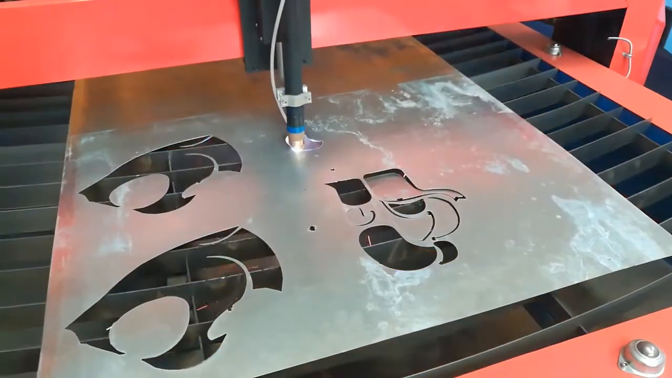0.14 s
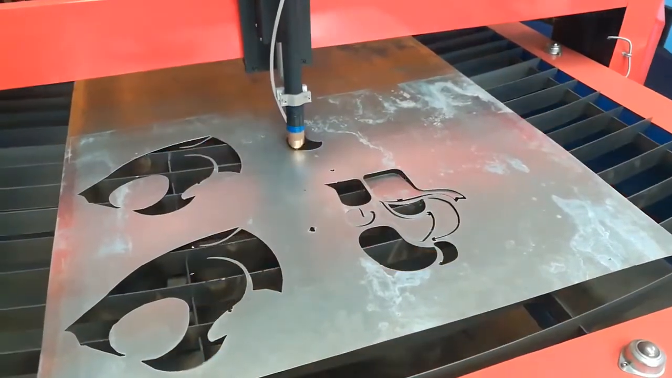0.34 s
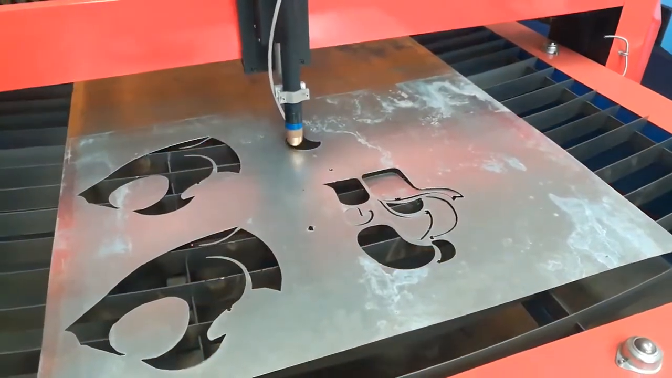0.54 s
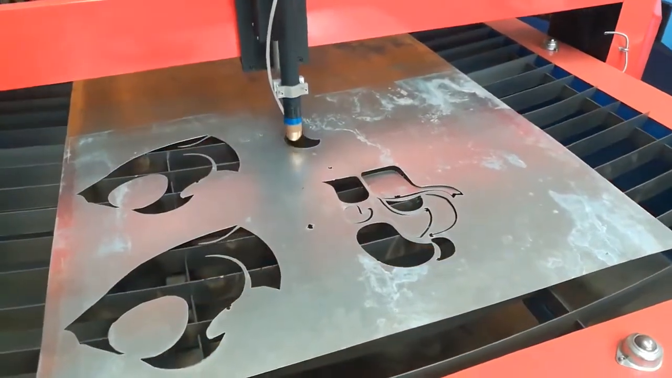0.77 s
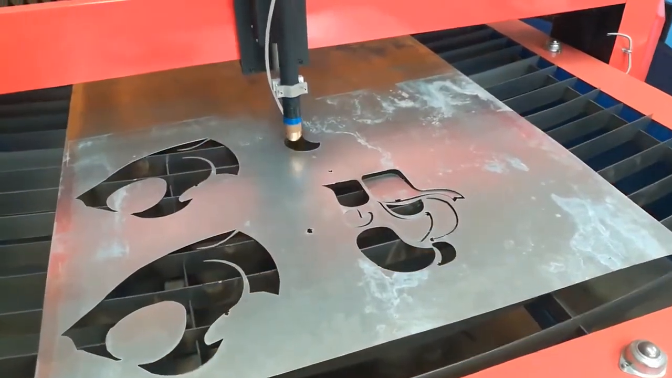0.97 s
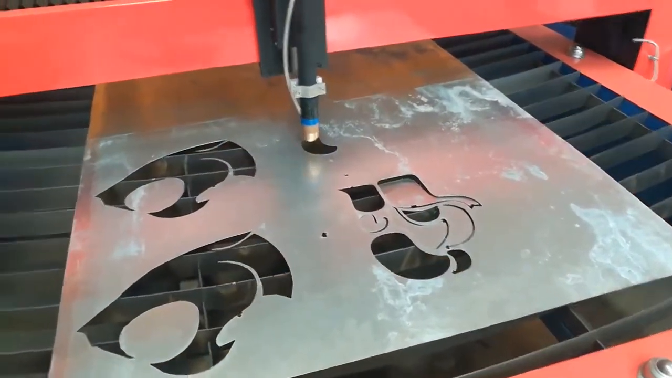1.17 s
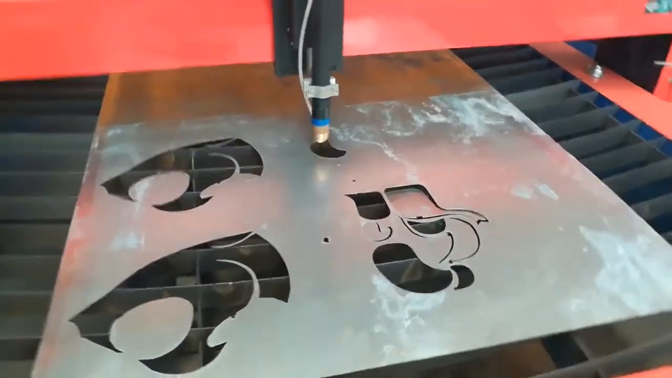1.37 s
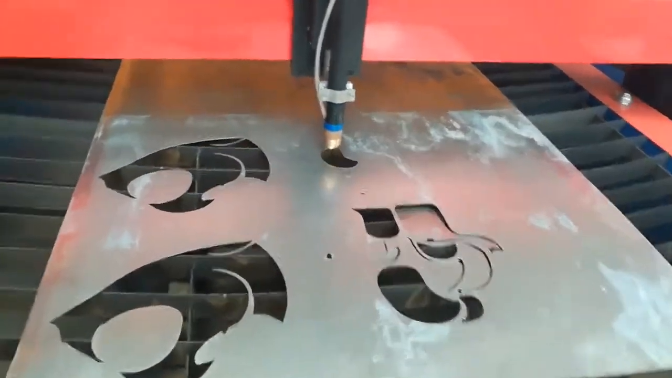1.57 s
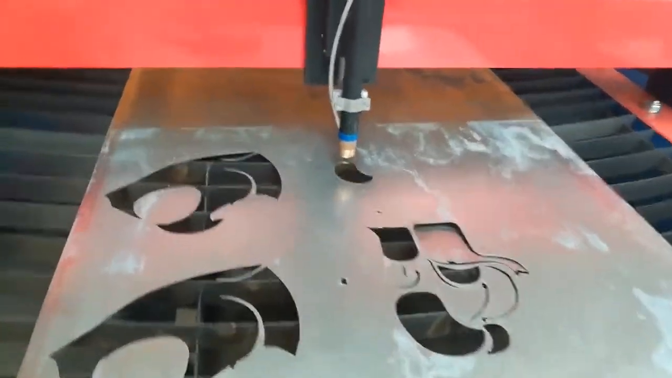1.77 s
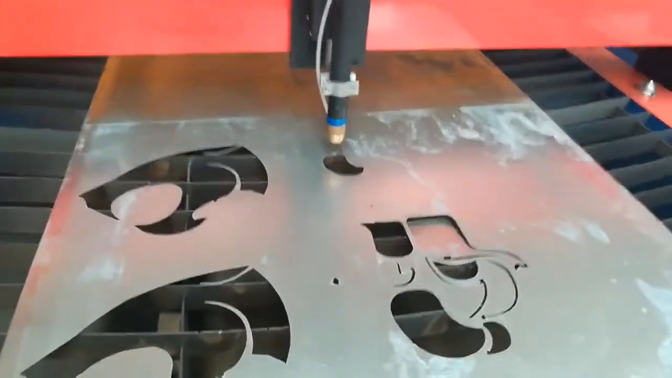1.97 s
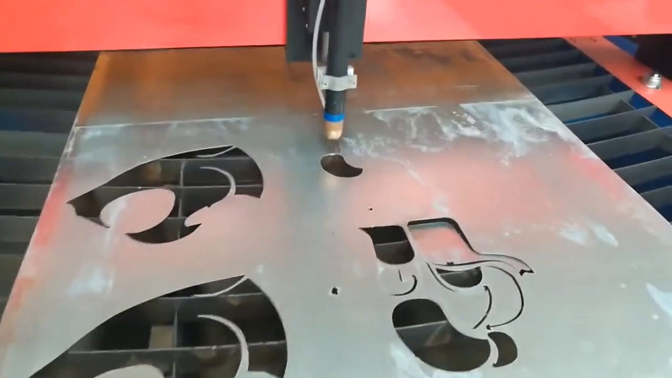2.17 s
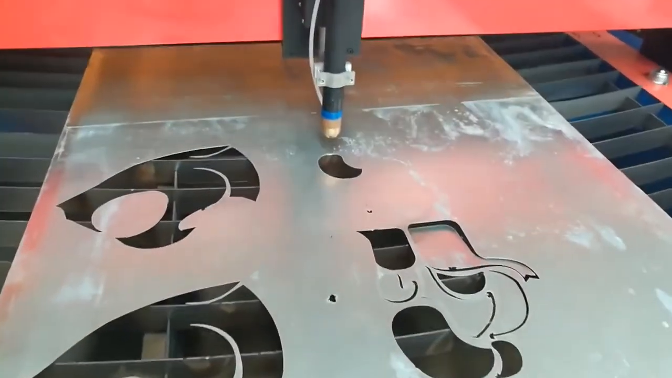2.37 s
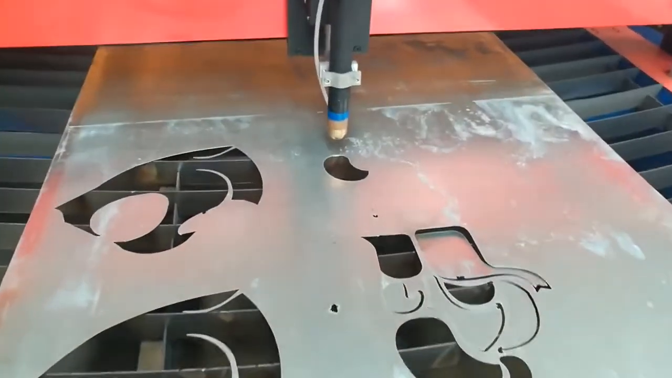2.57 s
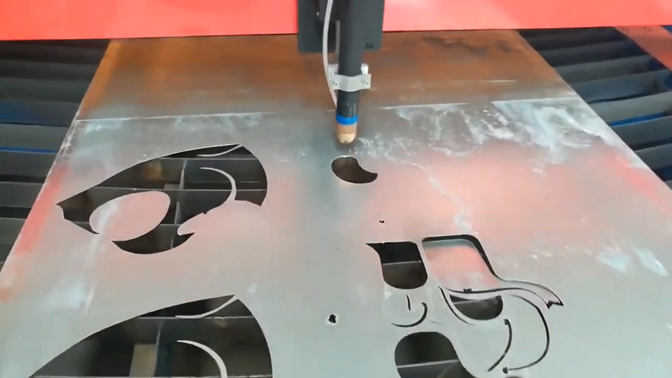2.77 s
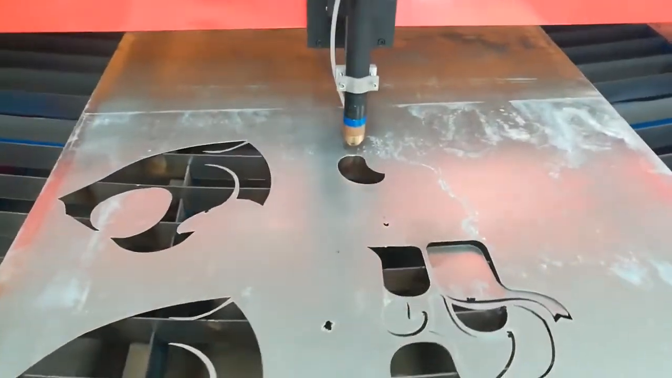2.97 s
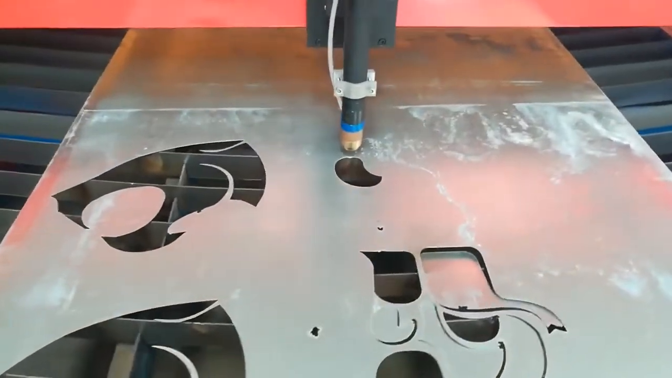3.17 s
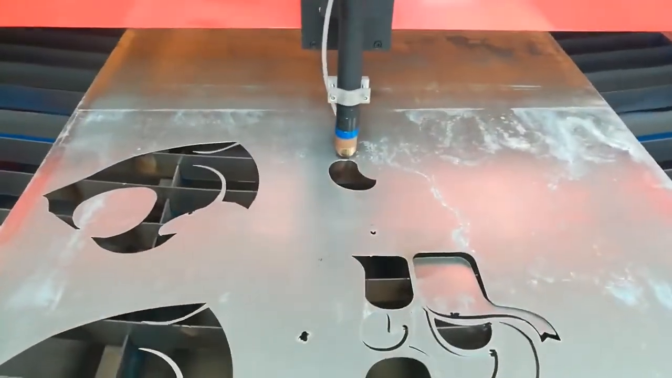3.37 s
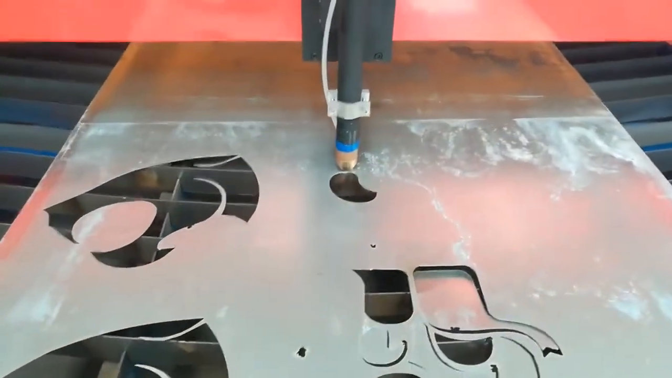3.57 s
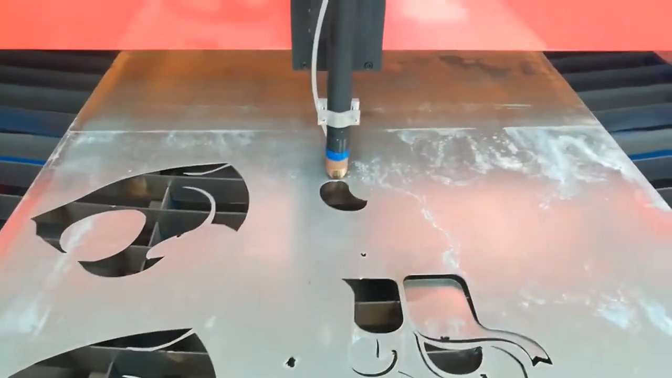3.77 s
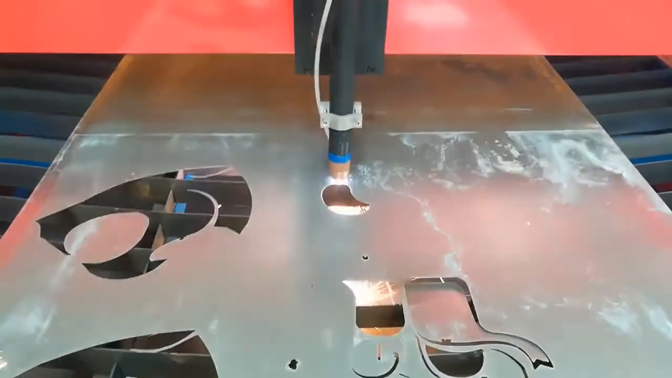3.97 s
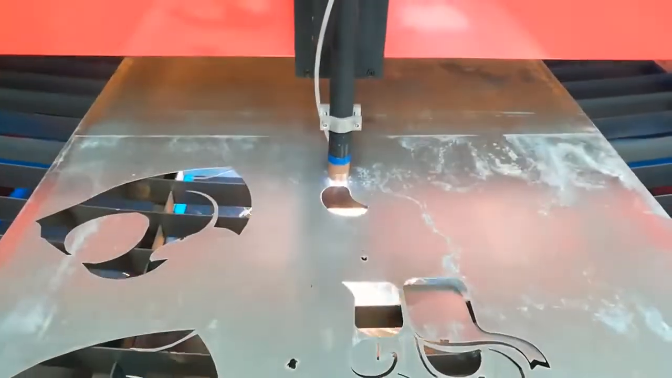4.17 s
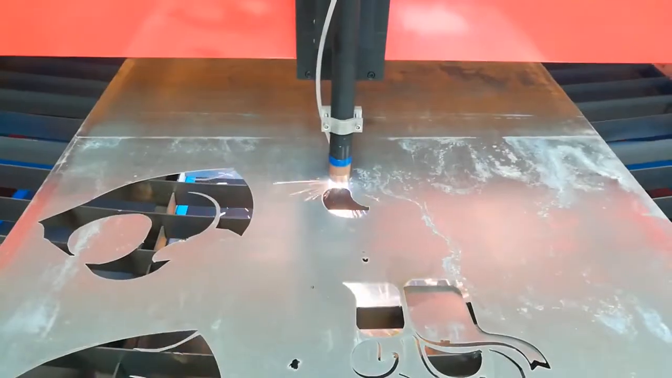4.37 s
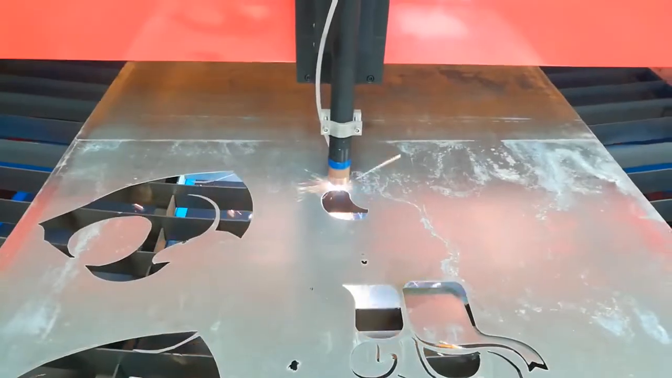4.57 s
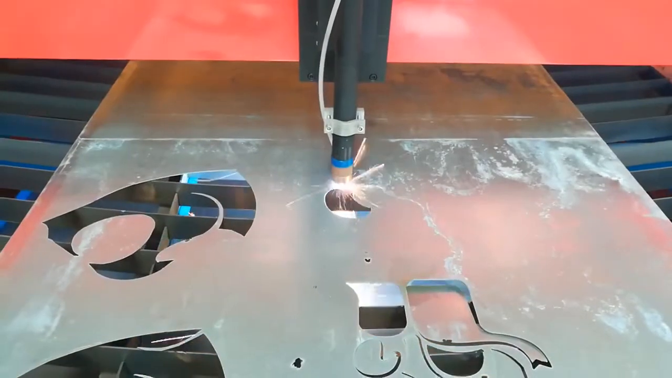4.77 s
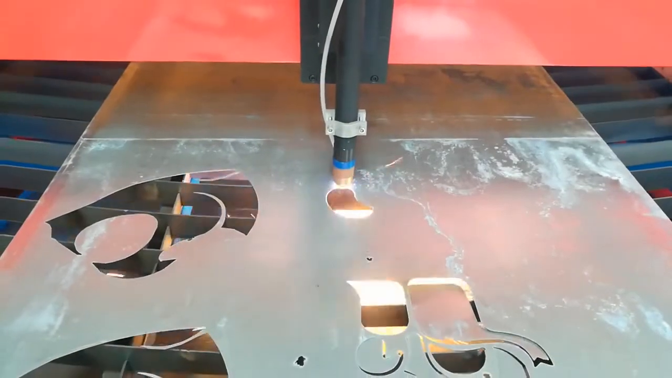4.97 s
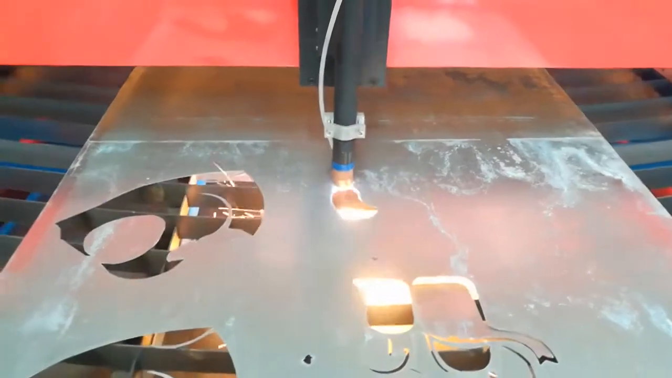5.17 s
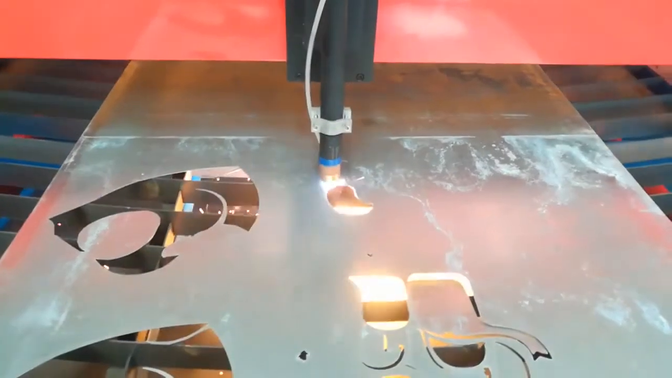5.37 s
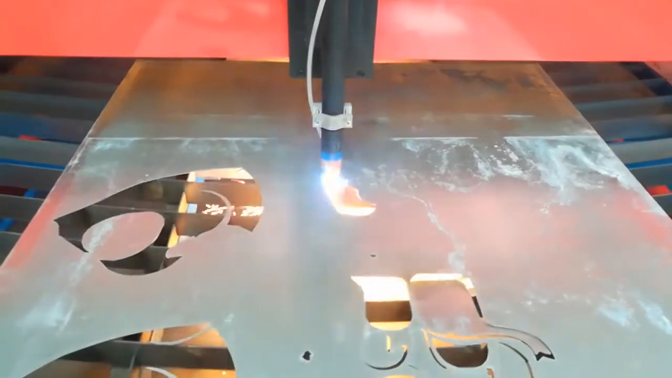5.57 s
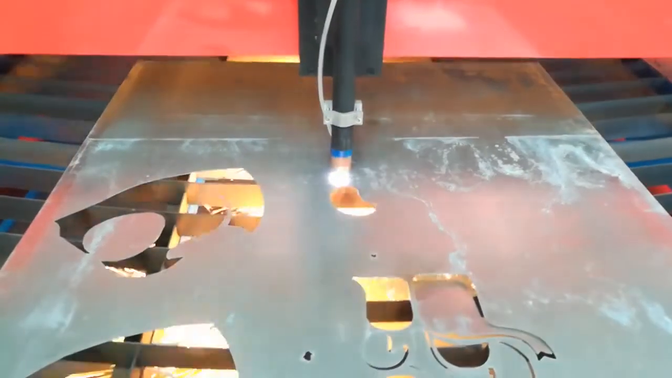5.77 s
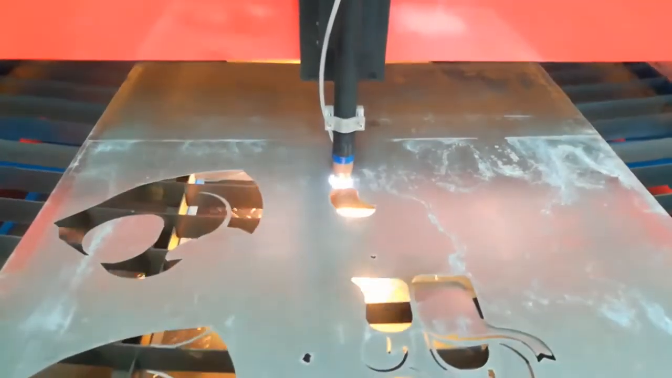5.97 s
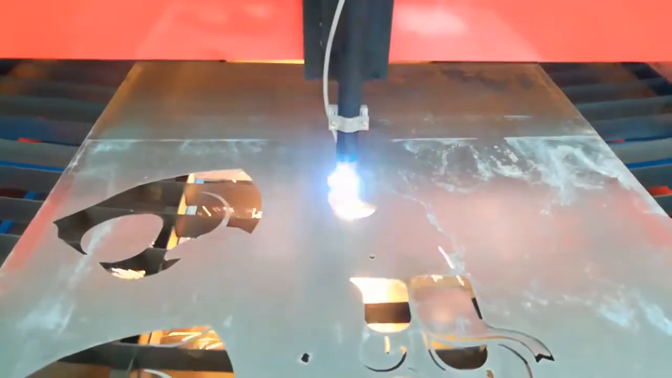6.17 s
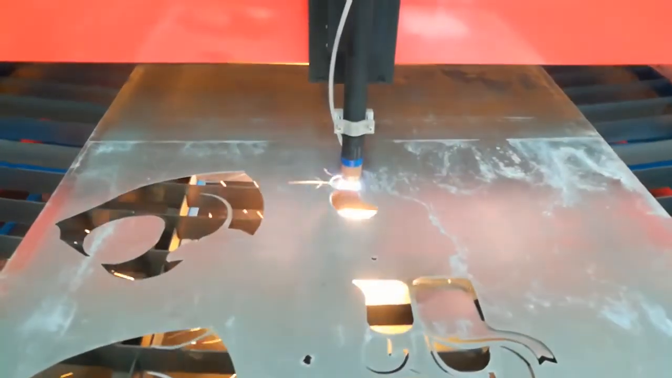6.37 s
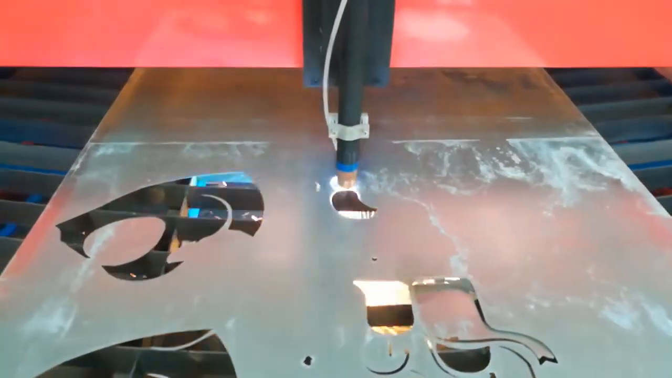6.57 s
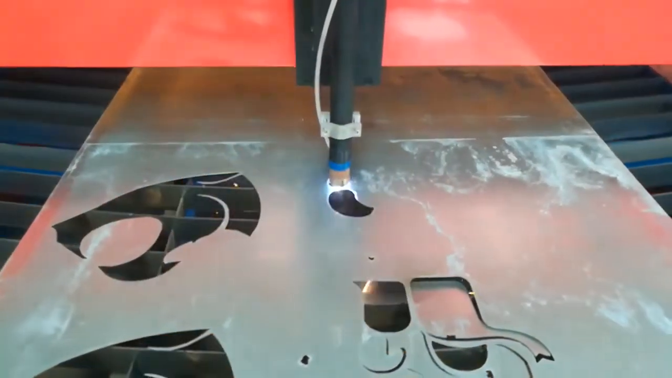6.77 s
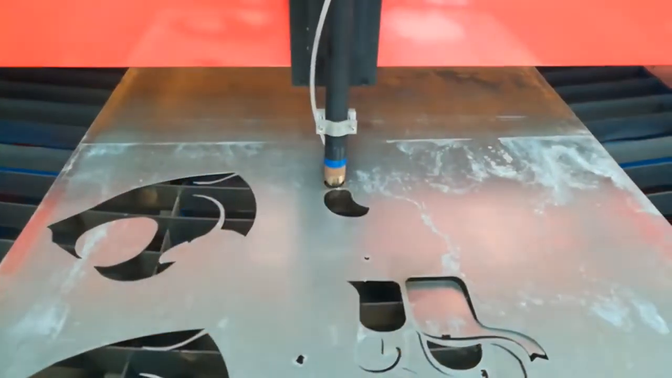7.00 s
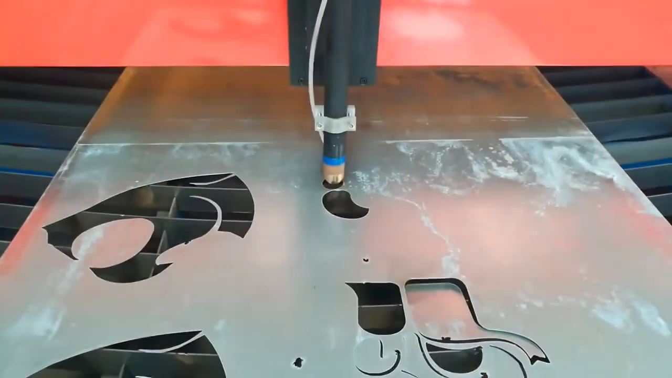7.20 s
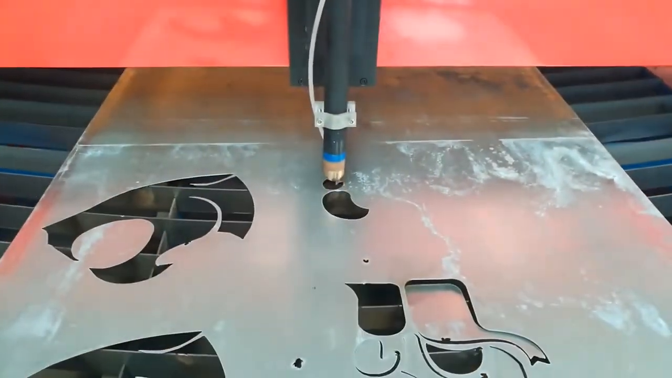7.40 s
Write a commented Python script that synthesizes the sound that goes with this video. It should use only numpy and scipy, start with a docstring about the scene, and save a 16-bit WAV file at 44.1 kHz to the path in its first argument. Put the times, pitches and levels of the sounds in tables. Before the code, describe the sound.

A plasma torch's harsh hiss cuts out with a thump, compressed air blows on, then the arc strikes, pierces steel plate, cuts and stops.

```python
"""A cutting arc hisses and fizzes and goes out with a thump; compressed air blows on while the torch head moves,
then the arc strikes again, pierces the steel plate, cuts and stops. The jet is turbulent noise in five registers,
coloured and levelled by what the torch does: it roars on plate, sings in the kerf, hisses at the nozzle.
Blown resonances whistle in the hole, damped pushes thump, and workshop rumble with a drive hum lies below."""
import sys
import numpy as np
from scipy import signal
from scipy.fft import rfft, irfft, next_fast_len
from scipy.io import wavfile
from scipy.ndimage import uniform_filter1d, map_coordinates

SR = 44100
rng = np.random.default_rng(int(sys.argv[2]) if len(sys.argv) > 2 else 0)


def unload_audio(sound):
    """Save the sound as a 16-bit wav file, at the path given as the first command line argument."""
    columns = np.transpose(np.atleast_2d(sound))
    # keep every value between -1 and 1, then stretch to whole-number steps
    steps = np.round(np.clip(columns, -1, 1) * 32767)
    wavfile.write(sys.argv[1], SR, steps.astype(np.int16))


N = 328104

# torch stances in order: spectrum_name, start_s, end_s
STANCES = [("TRAIL", 0, .352), ("OVER_CUT", .352, .87), ("AIR", .87, 2), ("HOVER", 2, 3.45),
           ("OPEN", 3.45, 3.857), ("PIERCE", 3.857, 4.99), ("ARC", 4.99, 6.988), ("AFTER", 6.988, 9)]
# register levels per stance, a first and a last row: rumble_db, plate_roar_db, kerf_db, spatter_fizz_db, nozzle_hiss_db
STANCE_LEVELS = dict( TRAIL=[(-53, -41, -29, -32.5, -27), (-52.5, -41, -31.5, -35.5, -27.5)],
                 OVER_CUT=[(-52.5, -43, -37.5, -48, -42.5), (-68, -53, -34.5, -46, -41.5)],
                 AIR=[(-57.5, -39.5, -33, -44, -41.5), (-59, -45.5, -37.5, -63, -43.5)],
                 HOVER=[(-55, -47.5, -38, -51, -45.5), (-74, -55.5, -36, -51.5, -39.5)],
                 OPEN=[(-59, -57.5, -43, -54.5, -34), (-68, -58, -45.5, -50.5, -34)],
                 PIERCE=[(-58.5, -39, -26, -29.5, -22.5), (-58.5, -39.5, -29, -32.5, -25.5)],
                 ARC=[(-60, -48.5, -31.5, -38, -25.5), (-59.5, -46.5, -33, -41, -26.5)],
                 AFTER=[(-63, -51.5, -41, -52, -43), (-69, -51.5, -40.5, -49, -42.5)])
# edges between the five registers: edge_hz
REGISTER_EDGES_HZ = [350, 1600, 4500, 8000]
# random wander of each register: wander_db
WANDER_DB = [2.8, 1.47, 0.38, 1.2, 0.32]
# jet swells or dips (meets plate, backs up in the hole, flares):
# peak_s, rise_s, fall_s, roar_db, kerf_db, fizz_db, hiss_db
SWELLS = [(.145, .025, .025, 2, 3.5, 0, 0.5), (.15, 0.053, .13, 5.5, 5, 1, 1.5),
          (.35, .02, 0.12, 3.5, 4, 5.5, 0), (.96, 0.071, 0.15, 3.5, 2, 1, 0),
          (1.1, .08, .08, 0.5, 2.5, 0.5, 0), (1.3, 0.16, 0.18, 7, 3.5, 3, 1),
          (1.63, 0.22, 0.23, 8.5, 1.5, 1, 2.5), (2.14, .1, 0.11, 1, 3.5, 4, -1),
          (2.42, .04, 0.22, 4, -0.5, -1, 0), (3.44, .07, .05, -4, 0, 6, 4),
          (3.83, 0.031, 0.034, -1, 13, 1, 2), (3.871, 0.013, 0.018, 0, -3, -11, 7),
          (4.17, 0.16, 0.067, 3.5, 2.5, 4, 3), (4.187, 0.014, .015, 6, 6, 3, 2),
          (4.24, 0.018, 0.058, 7.5, 2, 1.5, -1), (4.54, 0.11, .06, 1, 1.5, 0.5, 0.5),
          (4.74, .35, 0.17, 5, 9, 6, 4.5), (5.15, .1, 0.18, 4, 2, 2, -1),
          (5.8, 0.043, 0.37, 1, -1.5, -4.5, 3), (6.14, .15, 0.13, 0.5, 2, 1, 0),
          (6.43, 0.1, 0.12, 1.5, 1.5, 0, 2), (6.54, .03, 0.036, 6, 2, 0, -3),
          (6.6, 0.085, .1, 0.5, 3, 4, -2), (6.74, .12, 0.11, 11, 10, 8, 2.5),
          (6.8, 0.022, 0.027, 0, 3, 5, 1.5), (6.975, 0.024, 0.077, 10, 2, 2, -1.5)]
RUMBLE_PER_ROAR = 0.59  # share of a roar swell, in dB
# gas flow falters: centre_s, length_s, level_db
FALTERS = [(0.173, 0.02, -6), (4.778, 0.02, -2), (6.772, 0.015, -6.5)]

# spectra, relative density per Hz: freq_hz, density_db
# trailing arc
TRAIL_SPECTRUM = [(76, -38), (130, -10), (252, -5.5), (440, -25.5), (1000, -15), (1430, -16.5), (2230, -10),
                  (2750, -2), (3200, -2), (3500, -8), (4960, -14), (6830, -18), (8510, -12), (15500, -13.5)]
# air over the fresh cut
OVER_CUT_SPECTRUM = [(76, -56), (130, -23), (300, -19), (477, -23.5), (1110, -8.5), (1600, -14),
                     (2100, -8.5), (2600, -2.5), (3250, -6.5), (3700, -13.5), (4670, -18), (6500, -22),
                     (10400, -14), (15500, -16)]
# air sweeping across plate
AIR_SPECTRUM = [(76, -43), (130, -16), (280, -10.5), (487, -17.5), (1020, -6), (1750, -9.5), (3190, 0),
                (3750, -12), (5700, -19.5), (8500, -21.5), (11000, -15.5), (14500, -19.5), (15500, -19)]
# air from the waiting torch
HOVER_SPECTRUM = [(76, -35), (180, -8), (500, -21.5), (800, -14.5), (1020, -8.5), (1620, -11), (2320, -3.5),
                  (3260, -4.5), (3600, -10.5), (4100, -12.5), (4500, -18), (7390, -22.5), (9030, -14),
                  (13700, -9.5), (15500, -11.5)]
# air in the open
OPEN_SPECTRUM = [(59, -42), (100, -24), (146, -28), (270, -24), (576, -28), (861, -17), (2130, -19.5),
                 (3610, -8), (6000, -19.5), (9150, -13), (15500, -7)]
# piercing arc
PIERCE_SPECTRUM = [(59, -58), (100, -28), (270, -28), (477, -32), (1180, -12.5), (1310, -17.5), (1840, -18),
                   (3120, 0.5), (4020, -6), (4460, -8), (8060, -9.5), (12800, -2.5), (15500, -6)]
# cutting arc
ARC_SPECTRUM = [(59, -54), (100, -33), (156, -17.5), (411, -27), (640, -19), (1180, -10), (1340, -14),
                (2130, -12.5), (3250, -1), (5280, -10), (11300, -7), (13400, -2.5), (15500, -6)]
# cooling air through the kerf
AFTER_SPECTRUM = [(76, -53), (130, -24), (407, -30.5), (787, -17), (1130, -9.5), (1250, -13), (1550, -13.5),
                  (1820, -15), (2410, -5.5), (2890, -7.5), (3190, -5), (5260, -22.5), (15500, -18)]
# workshop rumble
SHOP_SPECTRUM = [(15, -35), (25, -8.5), (54, -2), (124, -9.5), (140, -5.5), (180, -34), (310, -120)]

# resonances of the pierced hole: centre_hz, width_hz, relative_db
HOLE_MODES = [(1130, 80, -30), (1500, 46, -20), (2710, 30, -10), (3310, 64, -10), (3550, 80, -12),
              (3993, 114, 4.5), (4000, 90, -22)]
# resonances of the open kerf: centre_hz, width_hz, over_roar_db
KERF_MODES = [(1154, 100, -6), (1480, 30, -18), (3190, 230, -16.5)]
# pressure steps: start_s, relative_db, boom_hz, relative_snap_db
THUMPS = [(.137, -26.5, 182, 0), (.340, -33.5, 169, 10), (.869, -46, 253, 13), (1.209, -39, 252, 19),
          (2.055, -36.5, 124, -12), (3.858, -36, 140, 0), (4.234, -44, 200, 12), (4.529, -44, 80, 6),
          (4.749, -40, 182, 8), (6.734, -28, 190, 9), (6.776, -41, 150, -6), (6.974, -35.5, 152, 15)]

# port balance: freq_hz, left_over_right_db
PORT_BALANCE = [(400, -0.5), (1300, -1), (2000, -3.5), (3000, -10.5), (4000, -8.5), (4800, 2.5), (6200, 1),
                (8000, -4.5), (10000, -11.5), (13000, -10), (14600, -17), (15400, -28)]
# likeness of the turbulence at the two ports: freq_hz, likeness_0_to_1
PORT_LIKENESS = [(60, 0.9), (130, 1), (290, 1), (640, 0.47), (1200, 0.97), (1900, 0.29), (3100, 0.86),
                 (5000, 0.21), (8000, 0), (15000, 0.5)]
# phase lead of the left port: freq_hz, lead_rad
PORT_LEAD = [(1900, -0.5), (2500, 1.5), (3200, 1.73), (4400, 2.5), (6000, 4), (8000, 5), (15500, 12.5)]

TOP_HZ = 15850
# upper registers, left over right; the balance swings left once
PAN_DB, SWING_DB, SWING_FROM_S, SWING_TO_S, SWING_RAMP_S = -2, 3.3, 1.47, 2.05, 0.23
# WHISTLE_GROWTH: whistle dB per dB of kerf swell
WHISTLE_DB, WHISTLE_GROWTH, WHISTLE_FROM_S, WHISTLE_TO_S, WHISTLE_FADE_S = -35, 1.6, 3.87, 4.82, 0.17
# thin tone arching as the arc dies
GLIDE_FROM_S, GLIDE_TOP_S, GLIDE_TO_S = .185, .235, .34
GLIDE_HZ, GLIDE_TOP_HZ, GLIDE_DB, GLIDE_SAG_DB = 3640, 3820, -30, 10
SHOP_DB = -63
# table drive
HUM_HZ, HUM_FROM_S, HUM_TO_S, HUM_RAMP_S, HUM_DB = 72, 5.2, 6.15, .12, -61


def jet(swells_db):
    """Gas jet: turbulence in five registers, coloured, levelled and echoed anew for each torch stance."""
    noise, flow, surge = eddies(patchy_db=1.5, flutter_db=0.12), faltering(), wobble(14)
    gains = [amp(db + 0.21 * surge + wander_db * wobble(9)) for db, wander_db in zip(swells_db, WANDER_DB)]
    balance_db = PAN_DB + SWING_DB * gate(SWING_FROM_S, SWING_TO_S, SWING_RAMP_S)
    pan = amp(np.outer([.5, -.5], balance_db))
    gains[2:] = [gain * flow * pan for gain in gains[2:]]  # lapses and pan spare the rumble and roar
    spectra = dict(TRAIL=TRAIL_SPECTRUM, OVER_CUT=OVER_CUT_SPECTRUM, AIR=AIR_SPECTRUM, HOVER=HOVER_SPECTRUM,
                   OPEN=OPEN_SPECTRUM, PIERCE=PIERCE_SPECTRUM, ARC=ARC_SPECTRUM, AFTER=AFTER_SPECTRUM)
    # hole and kerf lift their own tones out of the roar
    hole = lambda hz: 1 + amp(-1.5) * modes(HOLE_MODES)(hz)
    kerf = lambda hz: 1 + modes(KERF_MODES)(hz)
    rings = dict(PIERCE=hole, ARC=kerf, AFTER=kerf)
    out, fade_s, margin = np.zeros((2, N)), .006, SR // 10
    for stance, start_s, end_s in STANCES:
        first = max(round(start_s * SR) - margin, 0)
        span = slice(first, min(round(end_s * SR) + margin, N))
        t = np.arange(N)[span] / SR
        since_start = t - start_s + fade_s * (start_s == 0)  # no fade-in at time 0
        share = np.clip(.5 + np.minimum(since_start, end_s - t) / fade_s, 0, 1)
        ring = rings.get(stance, lambda hz: 1)
        parts = registers(filtered(noise[:, span], ring), spectra[stance])
        drift_s = [start_s, min(end_s, N / SR)]
        drifts_db = [np.interp(t, drift_s, ends_db) for ends_db in np.transpose(STANCE_LEVELS[stance])]
        blast = sum(amp(db) * gain[..., span] * part for db, gain, part in zip(drifts_db, gains, parts))
        out[:, span] += echoes(share * blast, wet_db=-11, t60_s=0.074)
    return out


def eddies(patchy_db, flutter_db):
    """Turbulence at two ports: patchy white noise, partly shared, with a phase lead."""
    cells = signal.stft(rng.standard_normal((2, N)), nperseg=512)[2]
    patches = uniform_filter1d(rng.standard_normal(cells.shape[1:]), size=4, axis=0)
    patches = uniform_filter1d(patches, size=10, axis=1)
    pair = signal.istft(cells * amp(patchy_db * unit(patches)), nperseg=512)[1][:, :N]
    pair = pair * amp(flutter_db * wobble(150))
    # a + b and a - b correlate by the cosine of twice this angle
    angle = lambda hz: np.arccos(np.clip(along(PORT_LIKENESS, hz), -1, 1)) / 2
    a, b = filtered(pair, lambda hz: np.array([np.cos(angle(hz)), np.sin(angle(hz))]))
    lead = lambda hz: np.exp(.5j * np.outer([1, -1], along(PORT_LEAD, hz)))
    return filtered(np.array([a + b, a - b]), lead)


def registers(noise, spectrum):
    """A spectrum parted into five smooth-edged registers, each at rms 1."""
    low_hz = np.array([1e-3, *REGISTER_EDGES_HZ])[:, None, None]
    high_hz = np.array([*REGISTER_EDGES_HZ, SR])[:, None, None]
    slope = 12
    bands = lambda hz: 1 / np.sqrt((1 + (low_hz / (hz + 1)) ** slope) * (1 + (hz / high_hz) ** slope))
    colour = lambda hz: amp(along(spectrum, np.minimum(hz, TOP_HZ - 500)))
    return [unit(part) for part in filtered(noise, lambda hz: colour(hz) * bands(hz))]


def echoes(x, wet_db, t60_s):
    """Plate, gantry and slats return dense short echoes, band-limited and different at each port."""
    t = np.arange(SR // 10) / SR
    colour = signal.butter(1, [900, 9000], "bandpass", fs=SR, output="sos")
    tail = signal.sosfilt(colour, rng.standard_normal((2, len(t)))) * amp(-60 * t / t60_s)
    tail = amp(wet_db) * np.pad(tail / np.linalg.norm(tail[0]), ((0, 0), (90, 0)))  # 90 samples late
    return x + signal.fftconvolve(x, tail, axes=1)[:, :x.shape[1]]


def faltering():
    """Gain of the gas flow with its short lapses."""
    t = np.arange(N) / SR
    return amp(sum(db * np.exp(-((t - s) / length_s * 2) ** 4) for s, length_s, db in FALTERS))


def swelling():
    """dB that the triangular swells add to each of the five registers."""
    t = np.arange(N) / SR
    total_db = 0
    for s, rise_s, fall_s, *db in SWELLS:
        shape = np.interp(t, [s - abs(rise_s), s, s + abs(fall_s)], [0, 1, 0])
        total_db = total_db + np.outer(db, shape)
    roar_db, *rest_db = total_db
    return [RUMBLE_PER_ROAR * roar_db, roar_db, *rest_db]


def whistle(kerf_db):
    """The jet blows the hole's resonances during the pierce; a thin gliding sine sounds as the arc dies."""
    db = WHISTLE_DB + WHISTLE_GROWTH * kerf_db + 2.0 * wobble(20)
    on = gate(WHISTLE_FROM_S, SR, .03) * gate(-SR, WHISTLE_TO_S, WHISTLE_FADE_S)  # separate ramps in and out
    level = on * amp(db) * faltering()
    ringing = unit(filtered(eddies(patchy_db=1.0, flutter_db=-0.5), modes(HOLE_MODES)))
    blown = level * ringing * amp([[-6], [0]])  # the hole faces the right port
    hz, sag = curves([(GLIDE_FROM_S, GLIDE_HZ, 0), (GLIDE_TOP_S, GLIDE_TOP_HZ, 0), (GLIDE_TO_S, GLIDE_HZ, 1)])
    tone_db = GLIDE_DB - GLIDE_SAG_DB * sag + 1.5 * wobble(40)
    tone = gate(GLIDE_FROM_S, GLIDE_TO_S, .015) * amp(tone_db)
    return blown + tone * np.sin(2 * np.pi * np.cumsum(hz + 25 * wobble(204)) / SR)


def thumps():
    """Pressure steps: one low damped push, a rumbling puff and a short noisy snap."""
    out, t = np.zeros(N + SR), np.arange(SR // 8) / SR
    low = signal.butter(2, [60, 250], "bandpass", fs=SR, output="sos")
    mid = signal.butter(2, [500, 2600], "bandpass", fs=SR, output="sos")
    noises = rng.standard_normal((len(THUMPS), 2, len(t)))
    for (s, db, boom_hz, snap_db), noise in zip(THUMPS, noises):
        boom = np.sin(2 * np.pi * boom_hz * t) * amp(-60 * t / 0.037) * (1 - np.exp(-t / 0.001))
        puff = unit(signal.sosfilt(low, noise[0])) * amp(-18.5 - 60 * t / 0.23)
        snap = unit(signal.sosfilt(mid, noise[1])) * amp(snap_db - 15 - 60 * t / 0.029)
        out[round(s * SR):][:len(t)] += amp(db + 3.5) * (boom + puff + snap)
    return out[:N]


def shop():
    """Steady noise rumble of the hall and the wavering sine hum of the table's drive."""
    colour = lambda hz: amp(along(SHOP_SPECTRUM, hz)) * (hz < 300)
    rumble = unit(filtered(rng.standard_normal(N), colour))
    hum = np.sin(2 * np.pi * np.cumsum(HUM_HZ + 0.87 * wobble(4.1)) / SR)
    hum_gain = gate(HUM_FROM_S, HUM_TO_S, HUM_RAMP_S) * amp(HUM_DB + 1.2 * wobble(5))
    return amp(SHOP_DB) * rumble + hum_gain * hum


def amp(db):
    """Gain of a level in dB."""
    return 10 ** (np.asarray(db) / 20)


def unit(x):
    """x at rms 1."""
    return x / np.sqrt(np.mean(x ** 2) + 1e-20)


def along(points, hz):
    """Interpolates (freq_hz, value) points on a log frequency axis."""
    f, v = np.transpose(points)
    return np.interp(np.log(hz + 1), np.log(f + 1), v)


def curves(rows):
    """One value per sample for each column after the time in s."""
    s, *cols = np.transpose(rows)
    return [np.interp(np.arange(N) / SR, s, c) for c in cols]


def wobble(rate_hz):
    """A smooth random curve with rate_hz knots a second."""
    knots = rng.standard_normal(int(N * rate_hz / SR) + 4)
    return map_coordinates(knots, [np.arange(N) * rate_hz / SR])


def gate(start_s, end_s, ramp_s):
    """0 to 1 and back, with straight ramps centred on start and end."""
    t = np.arange(N) / SR
    return np.clip(.5 + np.minimum(t - start_s, end_s - t) / ramp_s, 0, 1)


def filtered(x, response):
    """x filtered by a real or complex response of frequency in Hz."""
    m = next_fast_len(x.shape[-1] + 8192)
    return irfft(rfft(x, m) * response(np.fft.rfftfreq(m, 1 / SR)), m)[..., :x.shape[-1]]


def modes(table):
    """Summed magnitude response of narrow resonances."""
    return lambda f: sum(amp(db) * (f * width) ** 2 / ((centre * centre - f * f) ** 2 + (f * width) ** 2)
                         for centre, width, db in table)


def scene():
    """Jet, whistle, thumps and workshop."""
    swells_db = swelling()
    return jet(swells_db) + whistle(swells_db[2]) + thumps() + shop()


def ports(hz):
    """Two ports facing different ways share the sound unevenly."""
    left = amp(along(PORT_BALANCE, hz))
    pair = np.array([left, np.ones_like(left)])
    return pair * 2 / np.sqrt(1 + left ** 2 + 2 * left * (hz < 1500))  # adds as amplitude below 1500 Hz


def record(dry):
    """Port colour, full-scale clipping and the band limit."""
    clipped = np.clip(filtered(dry, ports), -1, 1)
    return filtered(clipped, lambda hz: hz < TOP_HZ)


dry = scene()
out = record(dry)
unload_audio(out)
```